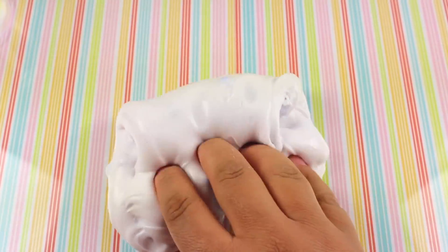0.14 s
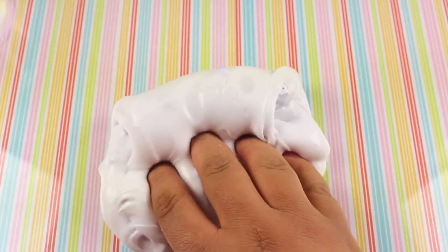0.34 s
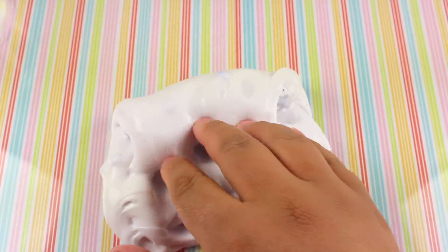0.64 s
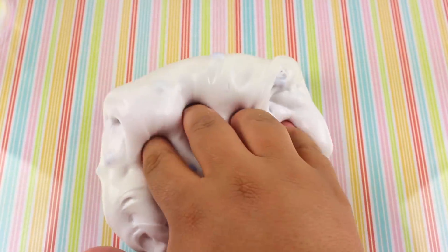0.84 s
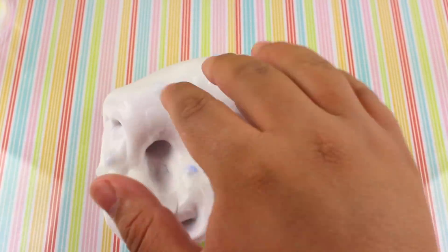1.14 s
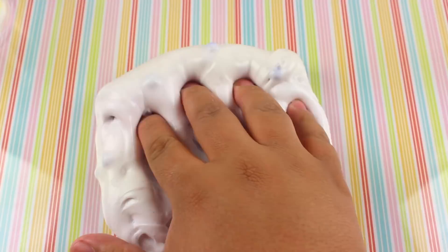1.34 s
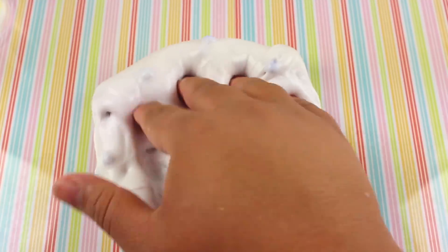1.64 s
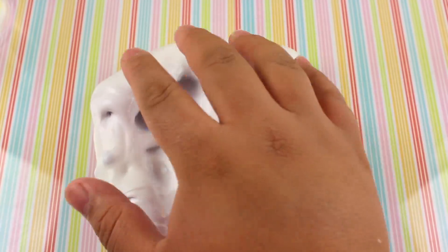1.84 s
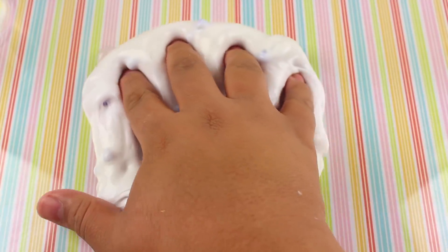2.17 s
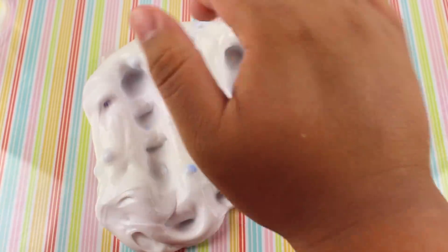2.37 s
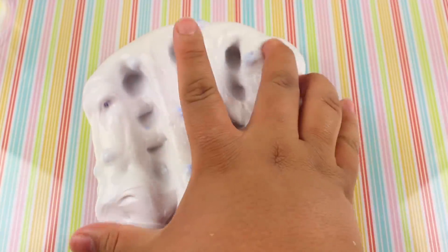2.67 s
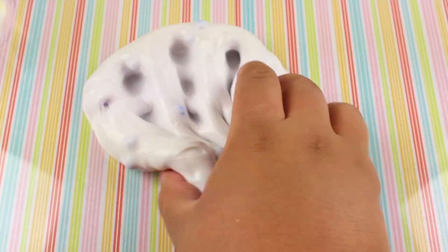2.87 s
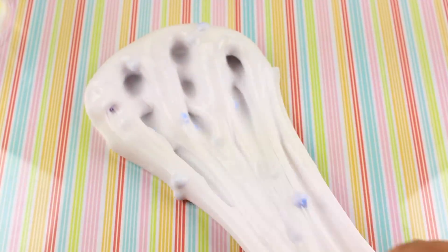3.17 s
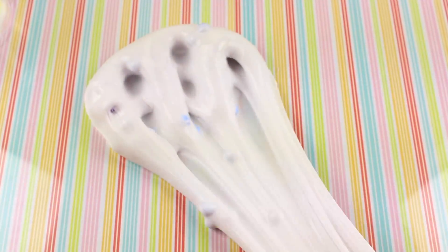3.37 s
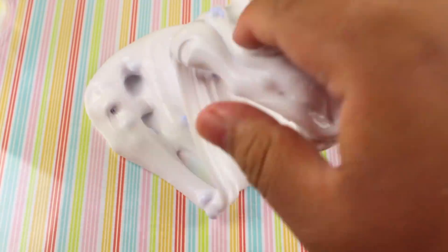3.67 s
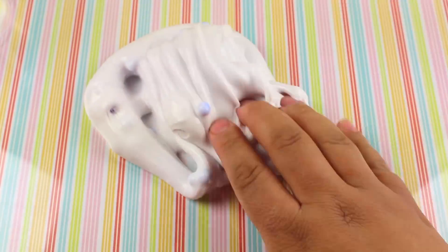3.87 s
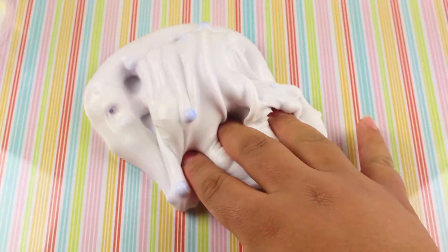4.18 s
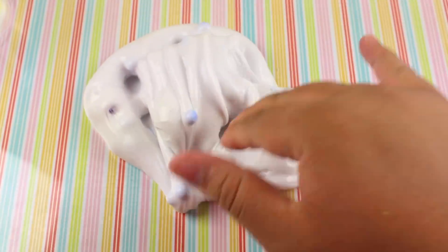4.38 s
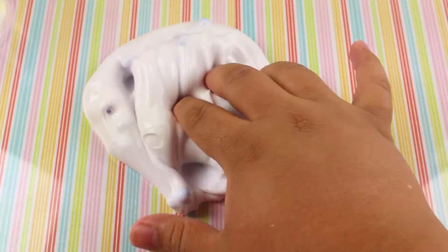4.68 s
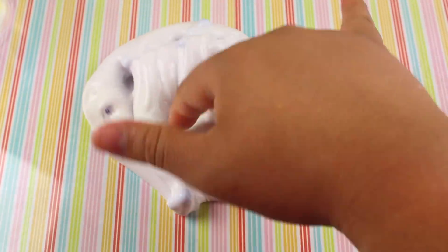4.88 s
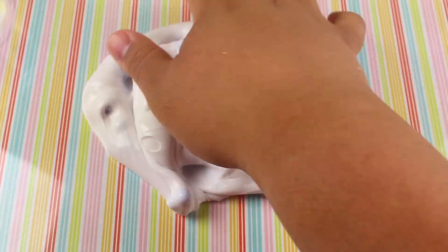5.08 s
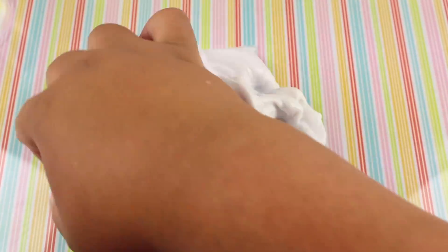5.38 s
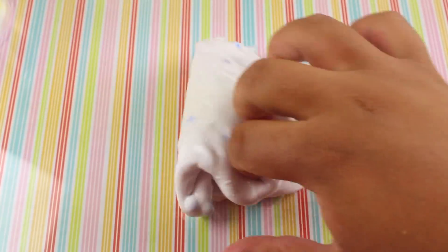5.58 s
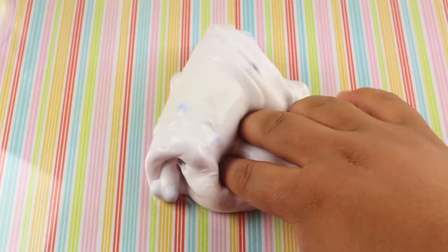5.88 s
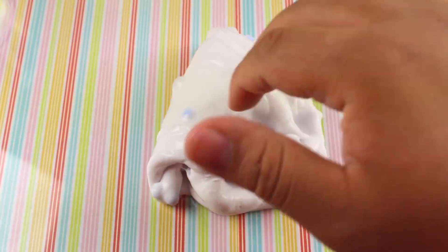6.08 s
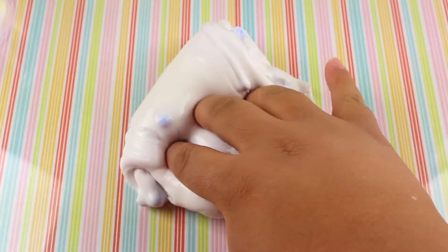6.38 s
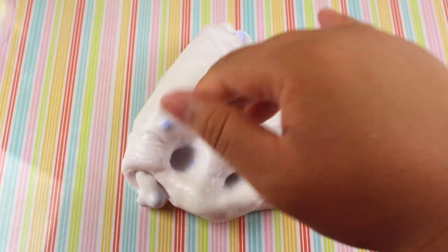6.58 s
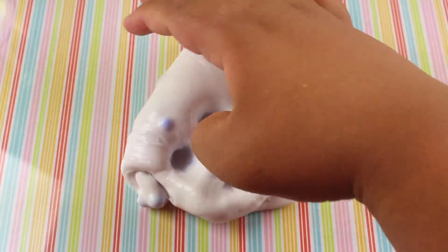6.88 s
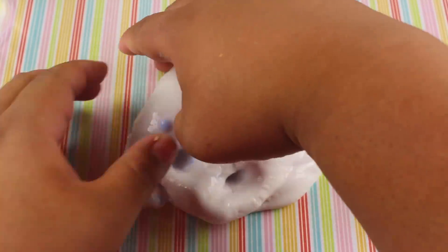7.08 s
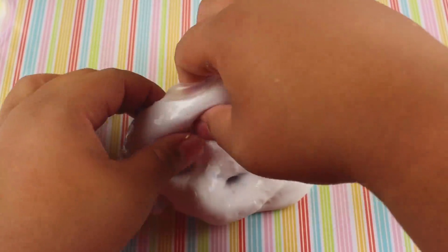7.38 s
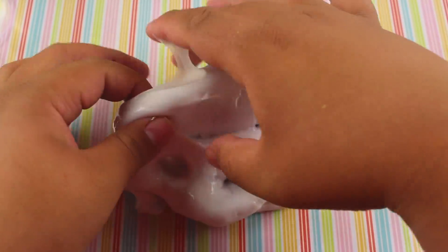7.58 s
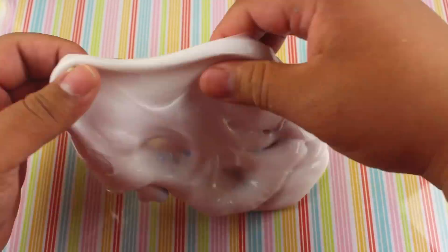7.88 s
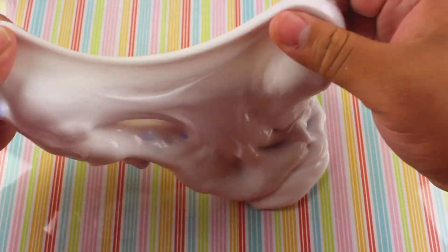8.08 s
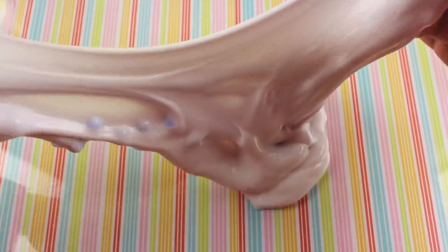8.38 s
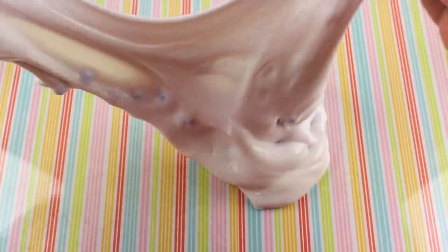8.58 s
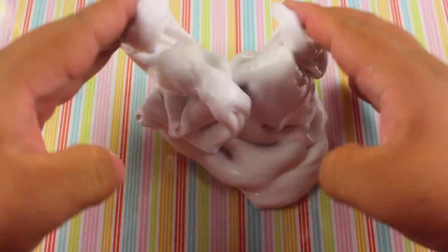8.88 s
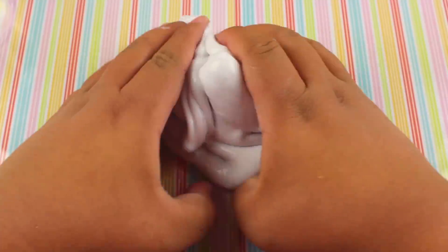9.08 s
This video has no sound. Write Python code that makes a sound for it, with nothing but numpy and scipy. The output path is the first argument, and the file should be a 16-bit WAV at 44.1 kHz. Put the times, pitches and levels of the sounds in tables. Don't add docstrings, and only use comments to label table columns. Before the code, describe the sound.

Close phone-microphone sound of fingers working thick slime on a thin table in a small room. The tail of a pop fades at the start, with faint crackle. Tight volleys of very loud, snapping wet pops come at about 0.5, 1.1, 1.75 and 2.4 seconds, a weaker pair near 1.55; each has a bright crack and a short hollow ring dropping in pitch, the strongest clipping harshly, with low table thuds underneath. From 2.7 to 4.3 the slime is pulled: small blister ticks, fine skin crackle, slight squelches and soft rumble. The folded lump pops at 4.45, 5.0, 6.07 and 6.65, with smaller bursts and a thump near 5.2. After 7 seconds only little bursts around 7.2 to 7.5, sparse ticks, faint wet hisses and stretching remain, with light sticky crackle near 9.0 to 9.2. Quiet room hush and a far wavering hum, slightly stronger toward the end, lie beneath.

```python
import sys
import numpy as np
from scipy import signal
from scipy.fft import rfft, irfft
from scipy.io import wavfile
from scipy.ndimage import uniform_filter1d

SR = 44100
rng = np.random.default_rng(int(sys.argv[2]) if len(sys.argv) > 2 else 0)


def dump_mix(stems):
    frames = np.atleast_2d(stems).T
    limited = np.clip(frames, -1, 1)
    pcm = np.round(limited * 32767).astype(np.int16)
    wavfile.write(sys.argv[1], SR, pcm)


def elevation(decibels):
    levels = np.asarray(decibels, float)
    return 10 ** (levels / 20)


N = 407043


def amp_of_time(rows):
    s, db = np.transpose(rows)
    return elevation(np.interp(np.arange(N) / SR, s, db))


def coloured(x, spectrum):
    hz, db = np.transpose(spectrum)
    bins = np.maximum(np.fft.rfftfreq(len(x), 1 / SR), 1)
    gain = elevation(np.interp(np.log(bins), np.log(hz), db))
    y = irfft(rfft(x) * gain, len(x))
    return y / np.sqrt(np.mean(y ** 2))


def highpass(x, hz):
    return signal.sosfilt(signal.butter(2, hz, "high", fs=SR, output="sos"), x)


def bandpass(x, low_hz, high_hz, order=2):
    return signal.sosfilt(signal.butter(order, [low_hz, high_hz], "band", fs=SR, output="sos"), x)


def slow_noise(step):
    count = N // step + 2
    return np.interp(np.arange(N) / step, np.arange(count), rng.standard_normal(count))


def add(out, s, sound):
    i = round(s * SR)
    out[i:i + len(sound)] += sound[:len(out) - i]


def pop(snap_db, snap_hz, ring_ms, hole_db, hole_hz, wet_db, glide, cycles, crack_db, spit_ms):
    flap_rad, wobble_turns = 0.2, 0.011
    ring_cut = 1.6
    t = np.arange(1500) / SR
    spit_noise, wet_noise, wander = rng.standard_normal((3, len(t)))
    wander = np.cumsum(wander)

    snap = np.sin(2 * np.pi * snap_hz * t * (1 - 4.0 * t) + flap_rad * wander)
    snap = snap * np.exp(-(t * 1000 / ring_ms) ** ring_cut)
    snap = highpass(snap, 0.5 * snap_hz)

    spit = elevation(-4) * spit_noise * np.exp(-t * 1000 / (spit_ms + 0.5 * ring_ms))
    crack = elevation(crack_db) * (t == 0)
    spray = elevation(-2.0) * bandpass(spit + crack, 0.65 * snap_hz, min(2.1 * snap_hz, 17000), order=3)

    splat_band = signal.butter(2, [0.22 * hole_hz, max(2.2 * hole_hz, 3000)], "band", fs=SR)
    wet = signal.lfilter(*splat_band, wet_noise) * np.exp(-t / 0.0028) * elevation(wet_db)

    settle_s = 4.0 / hole_hz
    turns = hole_hz * ((1 - 0.4 * glide) * t + glide * settle_s * (1 - np.exp(-t / settle_s)))
    turns = turns + wobble_turns * wander
    hole = np.sin(2 * np.pi * turns) * np.exp(-t * hole_hz / cycles)
    hole = hole * (1 - np.exp(-t * hole_hz / 1.5))
    return elevation(snap_db) * (elevation(-3.5) * snap + spray) + elevation(hole_db + 1.0) * (hole + wet)


FINGER_POKES = [(-.16, 23, 4305, -16, 1520), (-.14, 15, 3860, -1, 650), (0.5223, 0, 3700, -17, 1380),
                (0.5230, -1.5, 3200, -16, 2920), (.5457, 6.5, 7000, -10, 2660), (0.5478, 3, 2600, -6.5, 700),
                (.5555, -8.5, 3000, -22.5, 1900), (0.5687, 7, 4345, 3, 2267), (1.1074, -6.5, 3700, -19, 1784),
                (1.1106, -9, 3700, -16, 780), (1.1339, -17, 2700, -30.5, 2370), (1.1360, 6, 5600, -4.5, 2380),
                (1.1563, -14, 3900, -30, 2500), (1.1621, 0, 7380, -5.5, 2260), (1.1642, -10, 7500, -18, 1246),
                (1.1656, -6, 4500, -13.5, 700), (1.1676, -8.5, 7000, -18.5, 2400),
                (1.1697, -6.5, 2501, -11.5, 603), (1.375, -27, 8930, -57.5, 2434),
                (1.5508, -9, 3196, -31.5, 3560), (1.5509, -10, 7700, -51, 3300),
                (1.7417, 1.5, 3800, -10.5, 1875), (1.7435, -3.5, 4500, -15.5, 2400),
                (1.7557, 6.5, 3611, 0, 2490), (1.757, 6.5, 4600, -12, 2520), (1.7802, -7, 3984, -22.5, 2010),
                (1.7794, 7.5, 4307, -5, 1430), (2.4046, -5, 5000, -22.5, 2954), (2.4064, 8, 4600, -14, 1807),
                (2.4209, 0, 3900, -15.5, 1993), (2.4364, -12.5, 4700, -16, 1680),
                (4.4200, -13, 5212, -40.5, 976), (4.4335, -23, 4030, -33, 986),
                (4.4666, 6, 8700, -14.5, 2279), (4.4683, -1, 5516, -40.5, 1454),
                (4.9641, -15.5, 3000, -34, 1668), (4.9648, 6, 6817, -15.5, 1664),
                (4.9940, 1.5, 6800, -10.5, 2715), (4.9960, 2, 5492, -7.5, 2579),
                (4.999, -3.5, 3519, -16.5, 589.5), (5.0143, -4.5, 1900, -9.5, 1935),
                (5.0160, -4.5, 4360, -7, 1846), (6.0609, -12, 9430, -33, 1955),
                (6.0617, 2.5, 4500, -12.5, 2052), (6.0630, 6.5, 6200, -12, 2066),
                (6.0650, 3.5, 4496, -7, 1050), (6.0821, -3.5, 3526, -5.5, 2117),
                (6.085, 1, 5940, -12, 2193), (6.0876, -7, 2800, -15, 1002), (6.6193, -13, 8620, -35, 2013),
                (6.622, 6.5, 5600, -7.5, 1069), (6.6463, -1, 5040, -13.5, 2054),
                (6.6493, 0, 4900, -7, 1682), (6.6723, -1.5, 5527, -12.5, 1844),
                (6.6735, -7.5, 2894, -11, 560)]
# (time [s], snap level [dB], snap pitch [Hz])
FILM_TEARS = [(.5223, -5.5, 10000), (.5232, -6, 12000), (.5479, -9, 7500), (.5702, -9.5, 7000),
              (1.1075, -21.5, 12900), (1.134, -24, 13000), (1.1566, -23.5, 11150), (1.1657, -8, 12000),
              (1.7418, -8.5, 10000), (1.7559, -6.5, 8923), (2.4047, -14.5, 9000), (2.4067, -13, 13500),
              (2.4365, -20.5, 12000), (4.4336, -19.5, 13460), (4.9652, -5.5, 12000), (5.0144, -17, 12020),
              (6.0828, -10, 11000), (6.0864, -14, 13030), (6.6221, -4, 10500), (6.6464, -9, 12890),
              (6.6497, -6.5, 10980), (6.6724, -10, 12920), (2.1315, -44, 12700)]
# (time [s], snap level [dB], snap pitch [Hz], hole level [dB], hole pitch [Hz])
BLISTER_BURSTS = [(2.8159, -27, 2540, -30.5, 1081), (2.894, -54, 2830, -41, 1312),
                  (2.9111, -20, 8740, -29, 1345), (2.9855, -37.5, 4120, -43, 4040),
                  (2.9875, -30, 3960, -29.5, 4060), (3.0515, -47.5, 3500, -49, 2300),
                  (3.2505, -48, 2510, -49, 2400), (3.278, -59, 3000, -57.5, 2800),
                  (3.0654, -21.5, 2740, -33, 1530), (3.1409, -38, 2737, -34.5, 2550),
                  (3.1971, -54.5, 2570, -39, 2190), (3.4246, -25, 6510, -36, 2010),
                  (3.456, -37.5, 4350, -43.5, 1980), (3.8347, -64.5, 2980, -41, 2250),
                  (3.9575, -35, 3190, -45.5, 1580), (4.0655, -66.5, 2580, -46, 1540),
                  (4.7067, -26.5, 7200, -37, 1072), (5.1893, -23.5, 4200, -20, 559.9),
                  (5.1987, -15.5, 3900, -28.5, 887), (5.2002, -16.5, 2060, -23, 1400),
                  (5.2964, -30, 3490, -33, 2054), (6.3226, -26, 6270, -38, 1075),
                  (7.2155, -33.5, 2475, -27.5, 2410), (7.234, -20, 3200, -31.5, 1080),
                  (7.4603, -32, 2670, -34, 2006), (7.4774, -51.5, 4020, -37, 702),
                  (7.5043, -23, 2530, -34.5, 1844), (7.835, -42.5, 3190, -46, 1030),
                  (7.9547, -42.5, 2690, -47, 2067)]
# (time [s], snap level [dB], snap pitch [Hz])
SMALL_TICKS = [(0.2356, -31, 3336), (0.7842, -51, 9220), (1.3796, -32.5, 2790), (1.6731, -30.5, 2870),
               (2.0258, -36.5, 4298), (2.0383, -30.5, 6477), (2.6822, -40, 4600), (2.9402, -34.5, 5140),
               (3.0245, -33.5, 2800), (2.791, -44, 3500), (3.1288, -35.5, 2535), (3.4825, -41.5, 12000),
               (3.6494, -34, 6494), (3.9125, -34.5, 3200), (4.1115, -38.5, 2560), (6.314, -40, 5050),
               (5.3517, -40, 2500), (5.6493, -40.5, 4530), (5.7433, -38, 8480), (6.3789, -33, 4394),
               (6.4155, -31, 5830), (7.343, -35.5, 2880), (7.5303, -41, 4520), (7.6341, -42, 5000),
               (7.897, -41.5, 3220), (7.9324, -32, 10070), (8.636, -43, 5980), (8.6573, -41, 2560),
               (9.0495, -30, 8500), (9.1732, -31, 2610), (9.2192, -35, 4470),
               (0.2104, -48, 4660), (.316, -50, 13000), (.385, -38.5, 6000), (1.6735, -40, 7000),
                (1.699, -46, 7000), (2.131, -49, 3000), (0.8306, -50.5, 2906), (0.8471, -39.5, 3010),
                (1.487, -59, 3000), (2.189, -50, 4026), (2.338, -51, 2600), (2.6979, -47, 4000),
                (2.7731, -45.5, 3010), (3.3525, -43, 2200), (3.521, -47, 5000), (3.787, -55.5, 3976),
                (3.8002, -49, 3500), (3.8833, -46, 2970), (3.905, -48, 1500), (3.9899, -43, 2203),
                (4.0811, -54, 4010), (5.275, -44, 8680), (5.3775, -55, 11000), (5.3942, -52, 4000),
                (5.4136, -48.5, 1500), (5.4204, -45, 7000), (5.574, -53, 1783), (5.682, -44.5, 2300),
                (6.3185, -36.5, 12140), (6.319, -31, 3500), (6.397, -50, 12000), (6.401, -52.5, 8000),
                (6.437, -48.5, 11500), (6.445, -50.5, 10940), (6.591, -46, 2980), (7.1878, -60.5, 3020),
                (7.466, -50, 4940), (7.514, -47, 2300), (7.7304, -44, 1800), (7.859, -48, 6040),
                (7.977, -53, 3000), (7.985, -51, 11000), (8.208, -48.5, 3000), (8.4007, -45, 3200),
                (8.4009, -48.5, 10000), (8.517, -53.5, 11000), (8.847, -55.5, 6020), (8.8705, -53, 2500),
                (8.981, -50, 2490), (9.0063, -38.5, 2500), (9.028, -60, 3500), (9.0698, -48, 3000),
                (9.102, -50.5, 2500), (9.1474, -47, 3000)]


def pops_and_ticks():
    lead_s = 0.25
    deep = dict(wet_db=4.2, glide=0.8, cycles=3.9)
    shallow = dict(wet_db=-6, glide=0.3, cycles=3.2)
    sharp = dict(crack_db=4, spit_ms=0.3)
    soft = dict(crack_db=1, spit_ms=0.7)
    film_ring_ms, small_ring_ms = 0.34, 0.4
    dent_hz, dent_db, dent_spread = 1890, -13.5, 0.3
    late_s = 0.0007
    out = np.zeros(N + round(lead_s * SR))

    for s, snap_db, snap_hz, hole_db, hole_hz in FINGER_POKES:
        ring_ms = 0.94 * elevation(0.43 * snap_db) * (4000 / snap_hz) ** 1.2
        ring_ms = np.clip(ring_ms, 0.2, 1.4)
        add(out, lead_s + s, pop(snap_db, snap_hz, ring_ms, hole_db, hole_hz, **deep, **sharp))

    for s, snap_db, snap_hz in FILM_TEARS:
        add(out, lead_s + s, pop(snap_db, snap_hz, film_ring_ms, -99, dent_hz, **shallow, **sharp))

    small = list(BLISTER_BURSTS)
    for s, snap_db, snap_hz in SMALL_TICKS:
        hole_hz = dent_hz * np.exp(dent_spread * rng.standard_normal())
        small.append((s, snap_db, snap_hz, snap_db + dent_db, hole_hz))
    for s, snap_db, snap_hz, hole_db, hole_hz in small:
        burst = pop(snap_db, snap_hz, small_ring_ms, hole_db, hole_hz, **shallow, **soft)
        add(out, lead_s + s + late_s, elevation(1.0) * burst)
    return highpass(out, 300)


# (peak time [s], crackle level [dB], rise per 10 dB [ms], fall per 10 dB [ms])
SKIN_TUGS = [(0, -52, 50, 50), (0.799, -71.5, 598.5, 294), (1.701, -72.5, 298.5, 597), (2.39, -60, 10, 143),
             (2.97, -61, 139.5, 195), (3.14, -60, 52, 98), (3.21, -53.5, 54, 30.5), (3.46, -63.5, 36, 54.5),
             (3.9, -71, 157, 340), (4.44, -45.5, 12, 63.5), (4.72, -62.5, 134, 26.5),
             (4.949, -65, 15.5, 43), (5.23, -60, 56.5, 122), (5.31, -64.5, 46, 50.5),
             (5.38, -58.5, 84.5, 62), (6.38, -66, 251.5, 39.5), (6.44, -71, 17, 22),
             (6.6, -67.5, 24, 288.5), (6.85, -67.5, 60, 56.5), (7.25, -65.5, 174, 252.5),
             (7.47, -59, 57, 59), (7.59, -61, 35, 61.5), (7.9, -67, 105.5, 87), (8.64, -68.5, 56.5, 45),
             (9.0, -70.5, 129.5, 199), (9.17, -61.5, 58, 201), (9.23, -56.5, 54, 70)]


def tearing():
    creep_db = -78
    ms = np.arange(0, N + 64, 64) * 1000 / SR
    power = elevation(2 * creep_db)
    for s, db, rise_ms, fall_ms in SKIN_TUGS:
        late_ms = ms - 1000 * s
        power = power + elevation(2 * (db + 10 * np.minimum(late_ms / rise_ms, -late_ms / fall_ms)))
    return np.interp(np.arange(N) * 1000 / SR, ms, np.sqrt(power))


# (frequency [Hz], density [dB per Hz])
SKIN_COLOUR = [(300, -32), (700, -14), (1800, -9), (3500, -10.5), (7000, -13), (16000, -20)]


def crackle():
    tears_per_s, spread_db, pitches = 9000, 2.0, 10
    clumps = slow_noise(300)
    torn = rng.random(N) < tears_per_s * elevation(4.0 * clumps) / SR
    tears = torn * rng.standard_normal(N) * elevation(spread_db * rng.exponential(1, N))
    dealt = rng.integers(0, pitches, N)
    out = 0
    for k, hz in enumerate(np.geomspace(700, 13000, pitches)):
        r = elevation(-60 * hz / (9.0 * SR))
        poles = [1, -2 * r * np.cos(2 * np.pi * hz / SR), r * r]
        out = out + signal.lfilter([1 - r * r], poles, tears * (dealt == k)) * np.sqrt(hz)
    return tearing() * coloured(out, SKIN_COLOUR)


# (time [s], length [s], slit pitch [Hz], level [dB])
SLITS = [(0.288, 0.059, 2520, -65), (0.337, 0.035, 2540, -69.5), (0.424, 0.056, 2490, -73),
         (0.509, 0.014, 5470, -67.5), (5.622, 0.024, 9000, -73), (5.361, 0.022, 4400, -58),
         (5.434, 0.013, 6000, -60.5), (3.88, 0.039, 7160, -75.5), (9.198, 0.043, 8000, -61.5),
         (2.298, 0.11, 910, -77.5), (2.394, 0.032, 4070, -59.5), (3.024, 0.0068, 3300, -52),
         (3.133, 0.015, 4700, -58), (3.2, 0.018, 7000, -71), (3.231, .012, 2500, -53),
         (3.143, 0.039, 2580, -59), (3.209, 0.052, 2430, -56), (4.113, 0.0062, 2508, -51.5),
         (4.955, 0.021, 2165, -67), (5.366, 0.04, 1090, -59.5), (6.839, 0.0098, 2300, -55.5),
         (7.586, 0.015, 2310, -51.5), (8.064, 0.036, 6540, -74), (8.251, 0.13, 4710, -76),
         (8.636, 0.043, 6010, -68.5), (9.079, 0.014, 2460, -62)]


def squelch():
    hold, most = 220, 17600
    out = np.zeros(N)
    for s, length_s, hz, db in SLITS:
        n = min(round(2 * length_s * SR), most)
        flutter = elevation(3.7 * np.repeat(rng.standard_normal(most // hold), hold)[:n])
        slit = signal.iirpeak(hz, 4, fs=SR)
        air = rng.standard_normal(n) * flutter
        air = signal.lfilter(*slit, signal.lfilter(*slit, air))
        add(out, s - length_s, elevation(db) * np.hanning(n) * air / air.std())
    return out


# (time [s], peak level [dB])
TABLE_THUDS = [(0.542, -19), (0.568, -24), (1.133, -23.5), (1.165, -23.5), (1.745, -25), (1.758, -25.5),
               (2.413, -20.5), (2.819, -43.5), (3.837, -50), (3.9605, -38.5), (4.419, -36), (4.468, -26),
               (4.963, -25), (5.001, -18), (5.1908, -20.5), (5.2003, -18.5), (5.299, -42), (6.064, -25.5),
               (6.084, -28), (6.621, -26), (6.65, -23.5), (6.677, -20), (7.19, -43.5), (7.216, -29.5),
               (7.2358, -23.5), (7.2495, -33.5), (9.006, -43), (9.072, -42.5), (9.174, -37.5), (9.209, -43)]
# (frequency [Hz], level [dB], t60 [s])
TABLE_MODES = [(133, 3, 0.085), (213, -1, 0.12), (299, -8.5, 0.11), (59, -14.5, 0.21), (439, -15.5, 0.15)]


def table():
    out = np.zeros(N)
    t = np.arange(SR // 4) / SR
    shares = rng.normal(0, 1, (len(TABLE_THUDS), len(TABLE_MODES)))
    for (s, db), share in zip(TABLE_THUDS, shares):
        ringing = np.zeros(len(t))
        for (hz, mode_db, t60_s), w in zip(TABLE_MODES, share):
            ringing += elevation(mode_db + 2.0 * w - 60 * t / t60_s) * np.sin(2 * np.pi * hz * t)
        add(out, s, -elevation(db - 1.5) * ringing * (1 - np.exp(-t / 0.0012)))
    return out


# (time [s], level [dB])
HAND_WEIGHT = [(0, -64), (.8, -62.5), (1.5, -68), (2.0, -66), (2.6, -68), (3.1, -59.5), (3.6, -80.5),
               (3.95, -66.5), (4.3, -75), (5.4, -56.5), (5.6, -76), (7.4, -63), (8.0, -81), (8.9, -89),
               (9.05, -66.5)]


def rumble():
    lumps = slow_noise(1300)
    low = bandpass(rng.standard_normal(N), 40, 260)
    return amp_of_time(HAND_WEIGHT) * elevation(3.0 * lumps) * low / low.std()


# (delay [ms], level [dB])
REFLECTIONS = [
    (2.3, -20),
    (9.9, -18),
    (19.6, -23.5),
]
# (frequency [Hz], level [dB], t60 [s])
ROOM_TAIL = [(152, 6, 0.63), (350, -3.5, 0.6), (700, -2.5, 0.23), (1400, -4, 0.34), (2800, -7, 0.23),
             (4600, -7, 0.3), (8000, -7, 0.21), (15000, -6, .17)]


def room(x):
    tail_db = -17 - 19.5
    t = np.arange(SR // 2) / SR
    echoes = np.zeros(len(t))
    for ms, db in REFLECTIONS:
        smear = 0.3 * rng.standard_normal(30) * np.exp(-np.arange(30) / 12)
        add(echoes, ms / 1000, elevation(db) * np.r_[1, smear])
    tail = signal.lfilter(*signal.butter(1, 10000, fs=SR), echoes)

    early = 1 + elevation(-1.0) * np.exp(-t / 0.016)
    onset = 1 - np.exp(-t / 0.00078)
    hz, db, t60_s = np.transpose(ROOM_TAIL)
    edges_hz = np.geomspace(80, 20000, 29)
    for low, high in zip(edges_hz, edges_hz[1:]):
        band = bandpass(rng.standard_normal(len(t)), low, high)
        centre = np.log(low * high) / 2
        band_db = np.interp(centre, np.log(hz), db)
        decay_s = np.interp(centre, np.log(hz), t60_s)
        tail += band * elevation(tail_db + band_db - 60 * t / decay_s) * early * onset
    return signal.fftconvolve(x, tail)[:len(x)]


# (frequency [Hz], density [dB per Hz])
HUSH_COLOUR = [(18, -21.5), (75, 5), (200, -12.5), (420, -12.5), (900, -24), (3100, -36.5), (4200, -29.5),
               (15500, -33)]
# (frequency [Hz], rms level [dB])
HUM_TONES = [(86.1, -72), (118.4, -81.5), (242.2, -82), (376.8, -78)]
# (time [s], level [dB])
HUM_LEVEL = [(0, -5.5), (5.3, -7), (5.9, -1), (6.5, -2), (8, 3), (9.23, 6.5)]


def background():
    t = np.arange(N) / SR
    sway = uniform_filter1d(rng.standard_normal((len(HUM_TONES), N)), size=15000) * np.sqrt(15000)
    hum = np.zeros(N)
    for (hz, db), w in zip(HUM_TONES, sway):
        hum += elevation(db - 2.0 + 0.92 * w) * np.sin(2 * np.pi * hz * t)
    hush = elevation(-67) * coloured(rng.standard_normal(N), HUSH_COLOUR)
    return hush + amp_of_time(HUM_LEVEL) * hum


def scene():
    slime = pops_and_ticks()
    slime[-N:] += crackle() + squelch()
    heard = (slime + room(slime))[-N:]
    return (heard + table() + rumble() + background())[None]


def top_cut(x):
    return signal.sosfilt(signal.butter(12, 15950, fs=SR, output="sos"), x)


def record(dry):
    rolled_off = bandpass(dry, 45, 17500)
    mix = np.clip(rolled_off, -0.99, 0.99)
    return top_cut(mix)


dry = scene()
out = record(dry)
dump_mix(out)
```